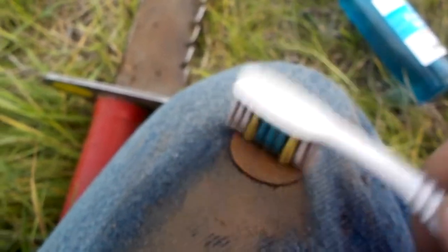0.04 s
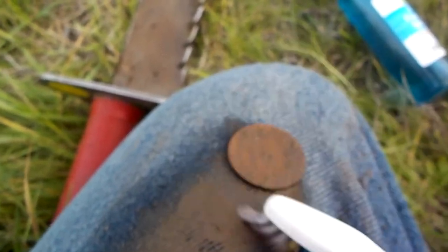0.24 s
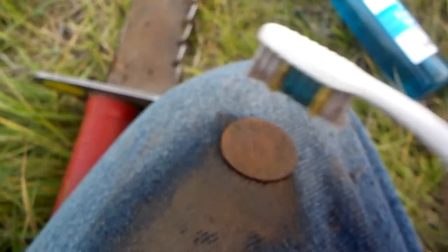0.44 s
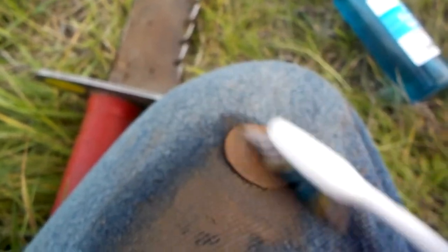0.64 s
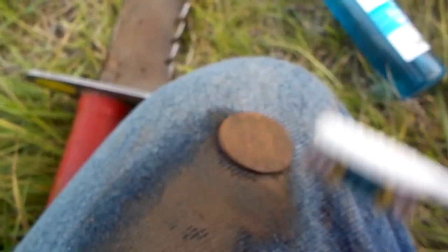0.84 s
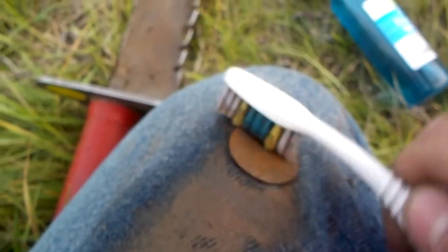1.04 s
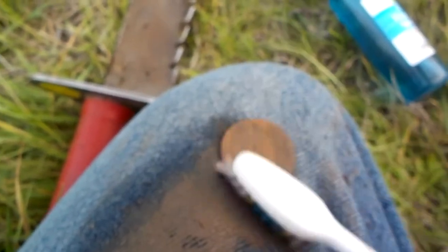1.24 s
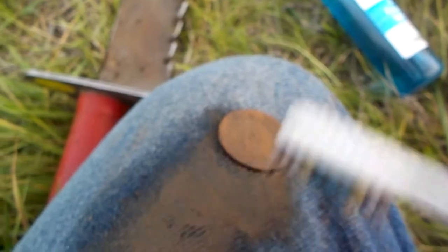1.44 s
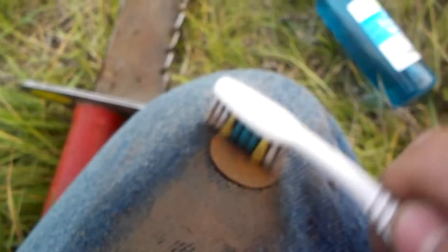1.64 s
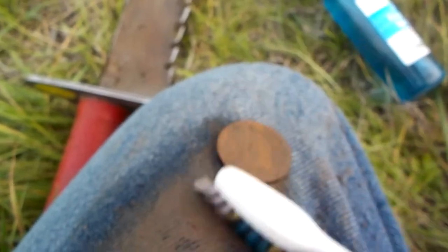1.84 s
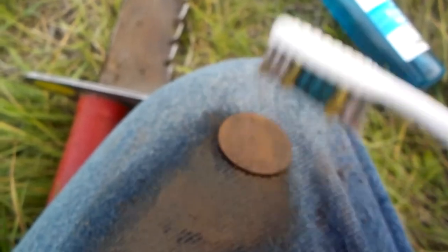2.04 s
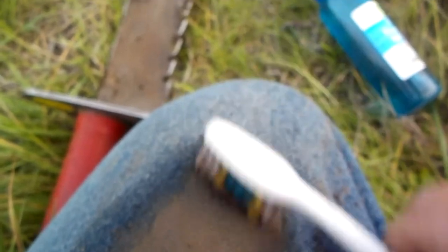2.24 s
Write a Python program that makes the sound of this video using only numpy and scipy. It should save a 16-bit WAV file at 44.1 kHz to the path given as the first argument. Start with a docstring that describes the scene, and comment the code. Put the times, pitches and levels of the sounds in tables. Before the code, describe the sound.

Close bristly scrubbing of a toothbrush on a small metal disc, four separate scratchy strokes outdoors

```python
"""Outdoors, close to the microphone, a toothbrush scrubs a small metal token on a denim-covered knee.
Four strokes each land with a light tick and swell into a hiss of random bristle clicks with a lower rasp;
tufts snap free along the way, the token pats back on the cloth, and one last landing tick follows.
Clicks and noise bursts are filtered into the brush's colours; the cloth keeps the token from ringing.
Behind lie faint outdoor air, a wavering low hum and microphone hiss, all through a recorder with notches."""
import sys
import numpy as np
from scipy import signal
from scipy.fft import rfft, irfft
from scipy.io import wavfile

SR = 44100
rng = np.random.default_rng(int(sys.argv[2]) if len(sys.argv) > 2 else 0)


def waveform_to_disk(signal):
    """Save audio, clipped to [-1, 1], as 16-bit WAV at the path in sys.argv[1]."""
    frames = np.transpose(np.atleast_2d(signal))
    scaled = np.clip(frames, -1, 1) * 32767
    samples = np.round(scaled).astype(np.int16)
    wavfile.write(sys.argv[1], SR, samples)


N = 101429  # length in samples, 2.3 s


def from_db(db):
    """Decibels to amplitude gain."""
    return 10 ** (np.asarray(db) / 20)


def rms_one(x):
    """Scale to unit rms."""
    return x / np.sqrt(np.mean(x ** 2) + 1e-20)


def per_bin(points):
    """Read a (Hz, value) table at every frequency of the spectrum, along a logarithmic frequency axis."""
    hz, value = np.transpose(points)
    bin_hz = np.arange(N // 2 + 1) * SR / N
    return np.interp(np.log(np.maximum(bin_hz, 1)), np.log(hz), value)


def colour(x, spectrum):
    """Shape a signal's spectrum by a (Hz, relative dB) table, then bring it to unit rms."""
    return rms_one(irfft(rfft(x) * from_db(per_bin(spectrum)), N))


def drift(corner_hz):
    """Random wandering, mostly slower than the corner frequency; unit rms."""
    hz = np.arange(N // 2 + 1) * SR / N
    return rms_one(irfft(rfft(rng.standard_normal(N)) / (1 + (hz / corner_hz) ** 2), N))


def pair(two, likeness):
    """Mix two unrelated signals into left and right with a given likeness at each frequency."""
    alike = np.clip(per_bin(likeness), 0, .995)
    mid, side = rfft(two)
    shared = np.sqrt((1 + alike) / 2) * mid
    opposed = np.sqrt((1 - alike) / 2) * side * [[1], [-1]]
    return irfft(shared + opposed, N)


def resonate(x, modes):
    """Parallel damped resonances (Hz, width Hz, relative dB), scaled to roughly keep white sound's power."""
    out, power = 0, 0
    for k, (hz, width_hz, db) in enumerate(modes):
        radius = np.exp(-np.pi * width_hz / SR)
        gain = (1 - radius * radius) / 2
        feedback = [1, -2 * radius * np.cos(2 * np.pi * hz / SR), radius * radius]
        ringing = signal.lfilter([gain, 0, -gain], feedback, x + 1e-18)
        out = out + (-1) ** k * from_db(db) * ringing  # neighbours have opposite sign
        power += gain * from_db(db) ** 2
    return out / np.sqrt(power)


def flicks(per_s, spread_db):
    """Two unrelated trains of bristle clicks at random moments, most small and a few large."""
    excess = np.minimum(rng.exponential(1, (2, N)), 4)
    sizes = from_db(spread_db * excess) * rng.choice([-1, 1], (2, N))
    return sizes * (rng.random((2, N)) < per_s / SR)


def bursts(rows, rise_s, fall_s):
    """Many bristles strike almost at once at each (s, dB): noise with a quick rise and exponential fall."""
    t, level = np.arange(N) / SR, 0
    for s, db in rows:
        rise = np.clip((t - s) / rise_s, 0, 1)
        fall = np.exp(-np.maximum(t - s - rise_s, 0) / fall_s)
        level = level + from_db(db) * rise * fall
    return level * rng.choice([-1, 1], (2, N))


def scrubbing():
    """Bristles flick over the relief in dense showers, slightly clumped as the tufts catch and let go."""
    # One table per stroke. Each row: time in seconds, then levels in dB, before the trims below,
    # of the bristle hiss, the low rasp and the top sizzle.
    strokes = [
        [(0.165, -69, -64, -72), (0.183, -73, -81, -80), (0.197, -54.5, -57.5, -67), (0.207, -58.5, -59.5, -64),
         (0.235, -47, -52, -53), (0.251, -50, -55, -53), (0.285, -48, -52, -50.5), (0.325, -47.5, -47, -52.5),
         (0.355, -50, -47, -53), (0.389, -51, -54, -57.5), (0.405, -51.5, -51, -67), (0.418, -66, -78, -74)],
        [(0.632, -63.5, -71, -76), (0.682, -58.5, -60, -64), (0.69, -52, -54, -60), (0.758, -47, -49, -51),
         (0.808, -45, -45, -50), (0.834, -46, -49.5, -52), (0.87, -48, -43, -55), (0.882, -50, -57, -54),
         (0.894, -49.5, -45.5, -55), (0.92, -52, -58.5, -64), (0.926, -64, -61, -73)],
        [(1.152, -61, -70, -74), (1.17, -64.5, -64, -74), (1.188, -59.5, -65.5, -67), (1.24, -52.5, -53.5, -59),
         (1.278, -48.5, -51.5, -53), (1.366, -51, -52.5, -52), (1.414, -50.5, -49, -54.5),
         (1.464, -50.5, -46, -53), (1.492, -50.5, -54.5, -57.5), (1.504, -50, -50, -61),
         (1.518, -54.5, -56.5, -75), (1.524, -79, -73, -79)],
        [(1.755, -66, -62, -69), (1.763, -63, -68.5, -70), (1.805, -52.5, -50.5, -59), (1.895, -48.5, -55, -52),
         (1.949, -49.5, -50, -54.5), (2.025, -46, -46, -49), (2.049, -50, -50.5, -62), (2.062, -62, -61, -76)],
    ]
    # Colours of the stroke. Each row: frequency in Hz, relative level in dB.
    rasp_colour = [(150, -53), (350, -25.5), (600, -10.5), (1000, -5), (1400, 0.5), (2150, 4.5), (2450, -5),
                   (2800, -15.5), (4000, -32)]
    hiss_colour = [(1800, -35.5), (3200, -13), (3750, -6), (4100, 1), (4500, 4), (5300, 1), (6000, -2),
                   (6700, -4), (8500, -17.5), (12000, -15)]
    sizzle_colour = [(6000, -55), (8700, -5), (10000, -2.5), (11500, -2.5), (13000, -2.5), (14000, 0),
                     (14800, 4), (15700, -8)]
    hiss_trim_db, rasp_trim_db, sizzle_trim_db = 1, 1.5, 3
    hiss_flicks_per_s, rasp_flicks_per_s = 22000, 11000
    head_hz, head_width_hz, head_db = 4324, 260, -9.5  # the brush head's main resonance
    firm_db, head_growth = -51, 0.93  # hiss level of a firm stroke; head's dB per dB of the hiss

    t = np.arange(N) / SR
    tufts = drift(corner_hz=180)
    levels = 0
    for stroke in strokes:
        s, *columns = np.transpose(stroke)
        touching = (t >= s[0]) & (t <= s[-1])
        levels = levels + touching * from_db([np.interp(t, s, db) for db in columns])
    hiss_level, rasp_level, sizzle_level = levels
    head_level = from_db(firm_db) * (hiss_level / from_db(firm_db)) ** head_growth

    def shower(per_s, spread_db, clump_db):
        """Clicks that grow and shrink with the tufts; a negative clump_db does so inversely."""
        return flicks(per_s, spread_db) * from_db(clump_db * tufts)

    rasp = colour(shower(rasp_flicks_per_s, spread_db=2.5, clump_db=0.84), rasp_colour)
    hiss = colour(shower(hiss_flicks_per_s, spread_db=3.0, clump_db=1.34), hiss_colour)
    head_clicks = shower(hiss_flicks_per_s, spread_db=0.0, clump_db=-1.8)
    head = rms_one(resonate(head_clicks, [(head_hz, head_width_hz, 0)]))
    sizzle = colour(shower(hiss_flicks_per_s, spread_db=1.5, clump_db=0.9), sizzle_colour)
    return (from_db(rasp_trim_db) * rasp_level * rasp
            + from_db(hiss_trim_db) * hiss_level * hiss
            + from_db(head_db) * head_level * head
            + from_db(sizzle_trim_db) * sizzle_level * sizzle)


def ticks():
    """Landings and snapping tufts excite the same short resonances; a landing adds a knock and a splash."""
    # The brush lands on the token. Each row: start in seconds, burst peak in dB before the trims,
    # extra knock in dB, extra splash in dB.
    landings = [(0.1527, -42.5, -3.5, 4), (0.6165, -38, 0, 3), (1.1423, -43.5, 0, 10),
                (1.742, -38.5, 1.5, 9.5), (2.284, -46, 2, 1)]
    # A tuft of bristles snaps free. Each row: start in seconds, burst peak in dB before the trim.
    tuft_snaps = [(0.1897, -42), (0.2666, -37), (0.273, -42), (0.306, -41), (0.6912, -34), (0.8009, -34),
                  (0.8042, -34), (1.8025, -40), (1.903, -28.5), (2.002, -35)]
    # Resonances of the brush head on the token. Each row: frequency in Hz, width in Hz, relative level in dB.
    knock_modes = [(1260, 350, -1), (2120, 490, -2)]
    click_modes = [(4280, 320, -1), (5100, 980, -8), (6460, 1600, -11.5), (14800, 3000, -17.5)]
    landing_trim_db, knock_trim_db, splash_trim_db, snap_trim_db = -5, -3, -17, -4.5
    landing_rise_s = 0.0015

    snap_rows = [(s, db + snap_trim_db) for s, db in tuft_snaps]
    snaps = bursts(snap_rows, rise_s=0.00089, fall_s=0.00057)
    s, peak_db, knock_db, splash_db = np.transpose(landings)
    click_db = peak_db + landing_trim_db
    clicks = bursts(zip(s, click_db), landing_rise_s, fall_s=0.0019)
    knocks = bursts(zip(s, click_db + knock_trim_db + knock_db), landing_rise_s, fall_s=0.0031)
    # the bristle tips' bright share of a landing
    splashes = bursts(zip(s, click_db + splash_trim_db + splash_db), landing_rise_s, fall_s=0.0014)
    bright = signal.sosfilt(signal.butter(2, 2300, "high", fs=SR, output="sos"), splashes)
    return resonate(clicks + snaps, click_modes) + resonate(knocks, knock_modes) + bright


def token_settling():
    """A dull pat, one damped resonance, as the token drops back on the denim after the last stroke."""
    settle_s, burst_db, settle_hz, settle_width_hz = 2.074, -55, 1240, 280
    pat = bursts([(settle_s, burst_db)], rise_s=0.0013, fall_s=0.0027)
    return resonate(pat, [(settle_hz, settle_width_hz, 0)])


def place_brush(brush):
    """Set the close brush before the two microphone ports by level and phase, a little to the right."""
    # Each row: frequency in Hz, left-right likeness from 0 to 1.
    likeness = [(300, .8), (1000, .97), (2300, .96), (3000, .5), (4200, .95), (6500, .86), (9000, .72),
                (10500, .83), (12700, .62), (15000, .85)]
    # Each row: frequency in Hz, left minus right in dB.
    balance = [(300, 0), (700, 1.5), (1300, -0.3), (2300, 3.5), (3300, -7), (4500, -1.5), (8500, -1),
               (10000, 0.5), (12000, -7), (15000, -2)]
    # Each row: frequency in Hz, lead of the left channel in radians.
    phase = [(1000, -.08), (4400, -.25), (6000, -.8), (7000, -.2), (11000, -2.1), (13500, -1.3)]
    spectrum = rfft(pair(brush, likeness))
    half = np.array([[1], [-1]]) / 2  # left and right each take half, in opposite directions
    gain = from_db(half * per_bin(balance))
    turn = np.exp(1j * half * per_bin(phase))
    return irfft(spectrum * gain * turn, N)


def aftersound(x):
    """Faint scatter from the ground and the body: a short decaying noise tail, different in each channel."""
    level_db, t60_s = -33, 0.29
    t = np.arange(SR // 2) / SR
    tail = rng.standard_normal((2, len(t))) * from_db(-60 * t / t60_s)
    tail = tail / np.sqrt(np.sum(tail ** 2, axis=1, keepdims=True))
    return from_db(level_db) * signal.fftconvolve(x, tail, axes=1)[:, :N]


def background():
    """Outdoor air (coloured noise) and a wavering hum, their lows swelling and sinking, under mic hiss."""
    # Colours of the air and of the microphone's hiss. Each row: frequency in Hz, relative level in dB.
    air_colour = [(25, -38), (55, -26), (100, -11), (150, -10), (195, -3), (250, -3), (500, 0.1), (1100, 2),
                  (1600, 0.15), (2300, -2), (3000, -16), (8000, -35)]
    mic_colour = [(500, -25), (3000, 4.5), (4500, 8), (6500, 3.5), (11000, 5), (15500, 6.5)]
    # Each row: frequency in Hz, left-right likeness of the air from 0 to 1.
    air_likeness = [(150, 0.91), (500, 0.58), (1000, 0.71), (1800, 0.82), (3000, 0.17)]
    # The low hum. Each row: mean frequency in Hz, rms level in dB before the swell.
    hum_tones = [(93, -91), (192, -87.5)]
    # Swell of the background's lows. Each row: time in seconds, gain in dB.
    low_swell = [(0, 0.5), (.5, 0), (1.05, 1), (1.4, -3), (1.65, -3), (1.8, 0), (2.3, -2)]
    air_db, mic_hiss_db, mic_likeness = -65, -66, .3  # air level is before the swell
    lows_below_hz = 463

    air = colour(pair(rng.standard_normal((2, N)), air_likeness), air_colour)
    mic_hiss = colour(pair(rng.standard_normal((2, N)), [(1000, mic_likeness)]), mic_colour)
    hum = 0
    for hz, db in hum_tones:
        wavering_hz = hz * (1 + 0.0283 * drift(corner_hz=15.5))
        tone = np.sin(2 * np.pi * np.cumsum(wavering_hz) / SR)
        hum = hum + from_db(db) * rms_one(tone)
    outdoors = from_db(air_db) * air + hum
    lows = signal.sosfiltfilt(signal.butter(2, lows_below_hz, fs=SR, output="sos"), outdoors)
    swell = from_db(np.interp(np.arange(N) / SR, *np.transpose(low_swell)))
    return outdoors + (swell - 1) * lows + from_db(mic_hiss_db) * mic_hiss


def scene():
    """The brush and token close to the microphone, their faint scatter, and the outdoors behind."""
    placed = place_brush(scrubbing() + ticks() + token_settling())
    return placed + aftersound(placed) + background()


def record(dry):
    """The recorder notches out several bands and cuts the top steeply."""
    # Dips in the recorder's response. Each row: centre in Hz, width in Hz.
    notches = [(1775, 160), (2560, 410), (2900, 36), (4980, 130), (7350, 1630), (7500, 830), (8050, 460),
               (8220, 1270)]
    cutoff_hz = 15800
    for hz, width_hz in notches:
        dry = signal.lfilter(*signal.iirnotch(hz, hz / width_hz, fs=SR), dry)
    return signal.sosfilt(signal.ellip(12, .1, 70, cutoff_hz, fs=SR, output="sos"), dry)


dry = scene()
out = record(dry)
waveform_to_disk(out)
```